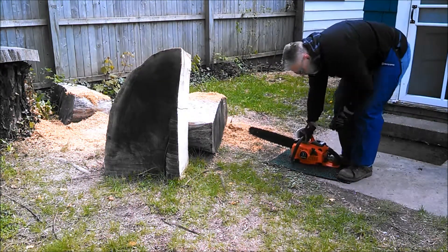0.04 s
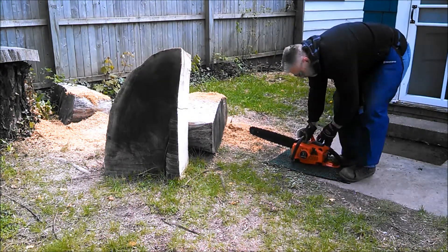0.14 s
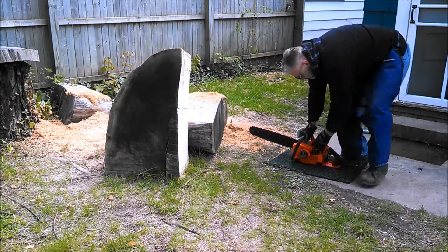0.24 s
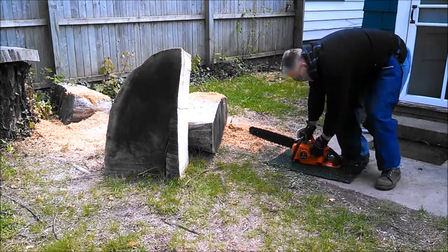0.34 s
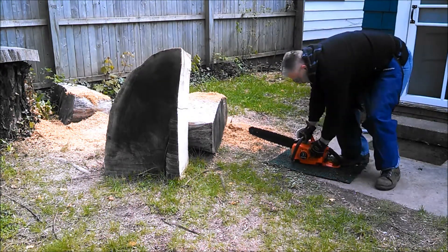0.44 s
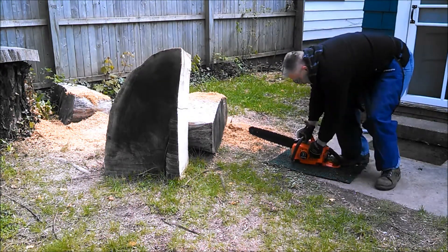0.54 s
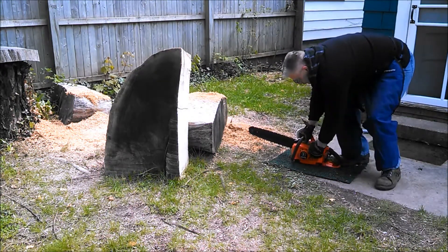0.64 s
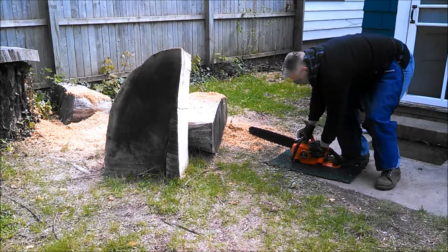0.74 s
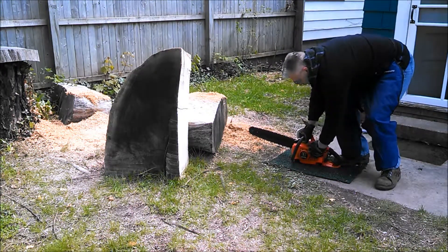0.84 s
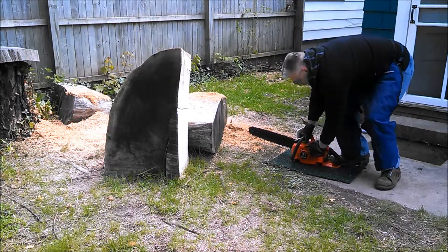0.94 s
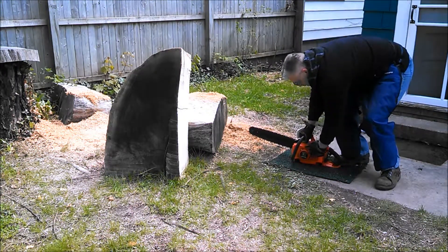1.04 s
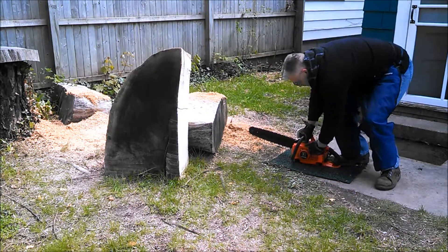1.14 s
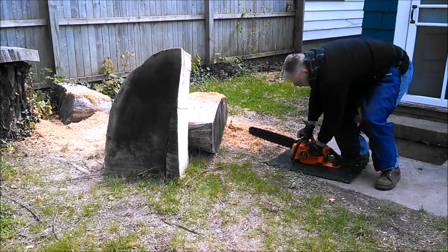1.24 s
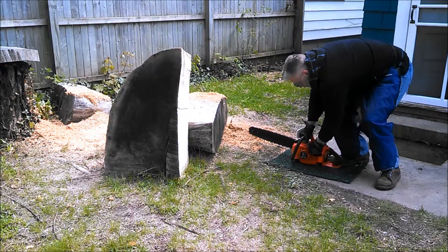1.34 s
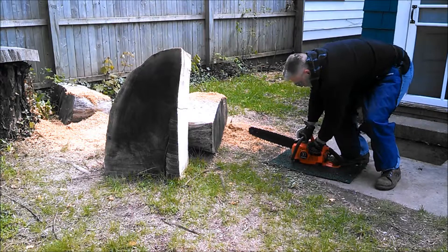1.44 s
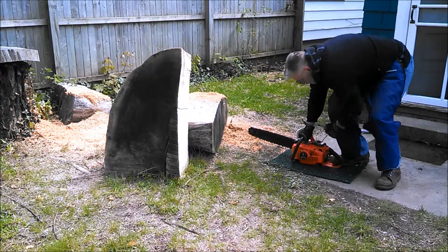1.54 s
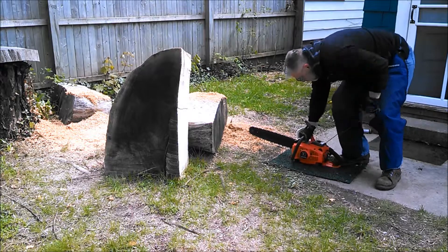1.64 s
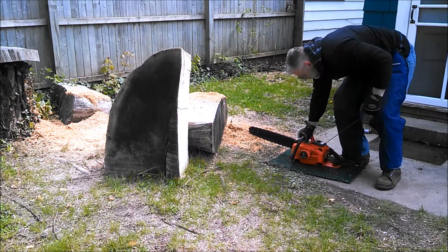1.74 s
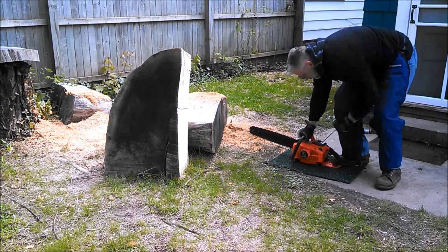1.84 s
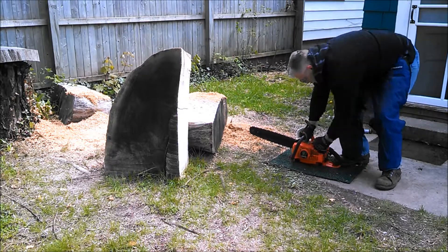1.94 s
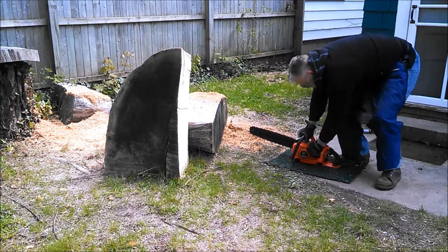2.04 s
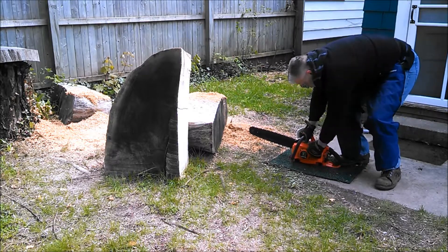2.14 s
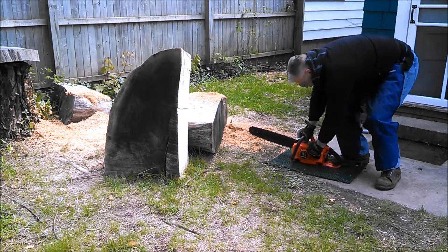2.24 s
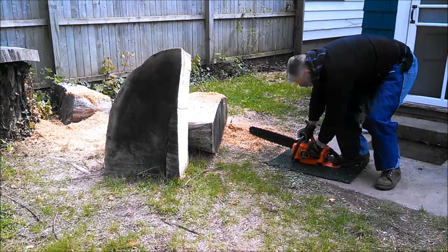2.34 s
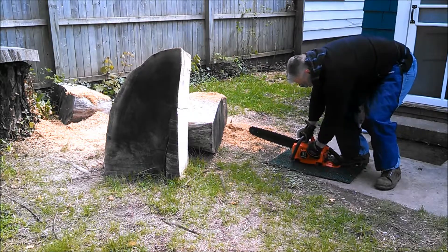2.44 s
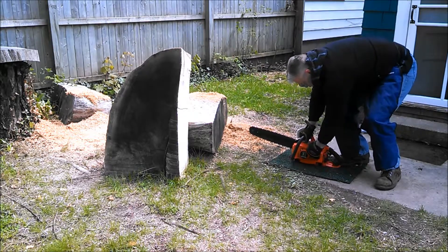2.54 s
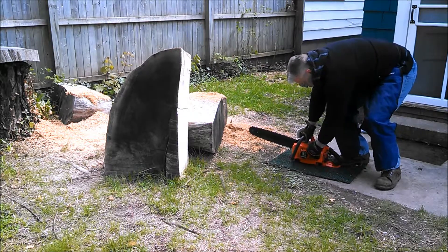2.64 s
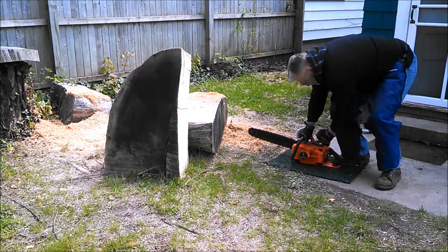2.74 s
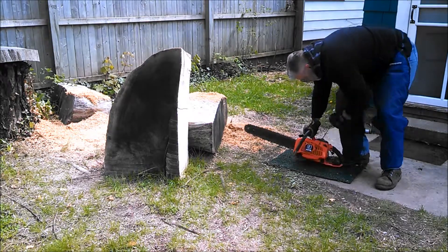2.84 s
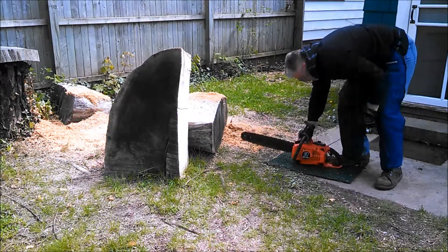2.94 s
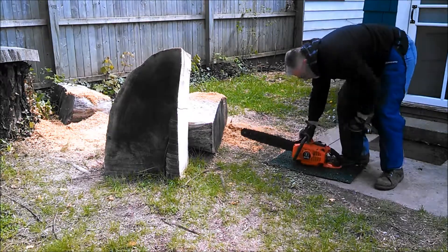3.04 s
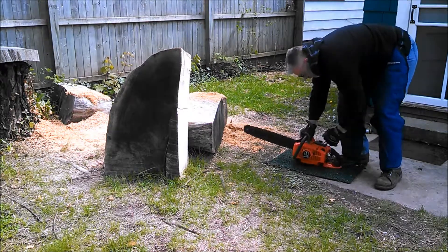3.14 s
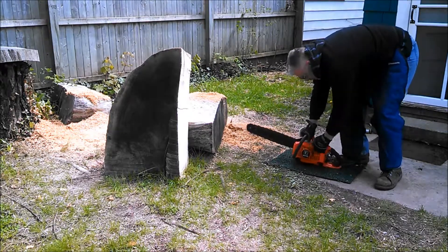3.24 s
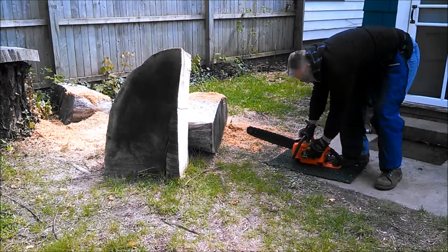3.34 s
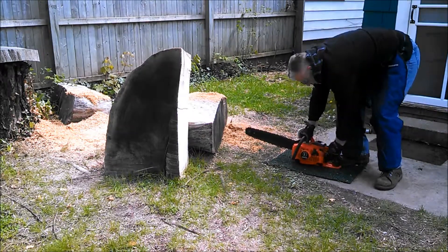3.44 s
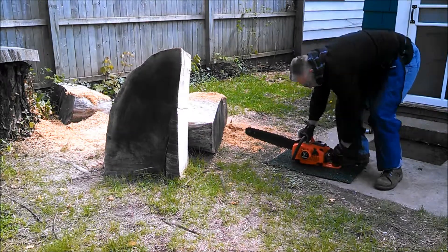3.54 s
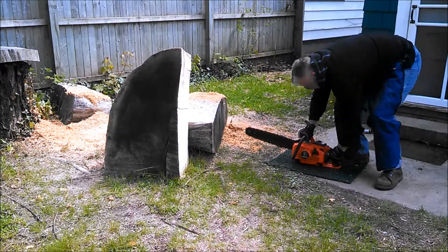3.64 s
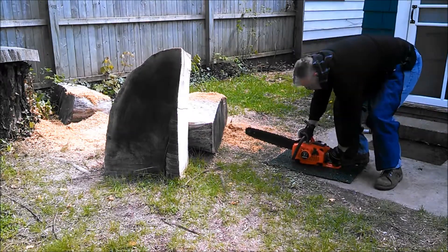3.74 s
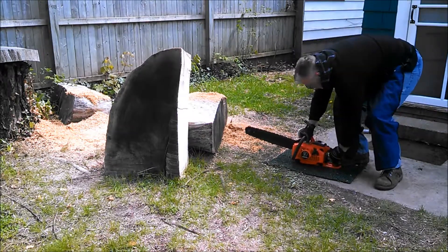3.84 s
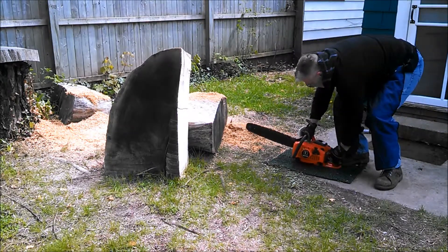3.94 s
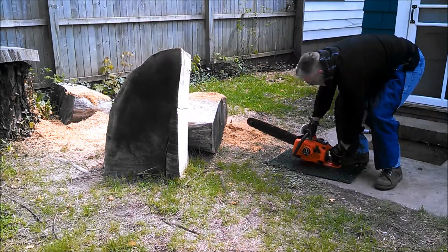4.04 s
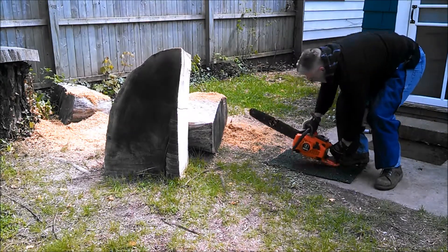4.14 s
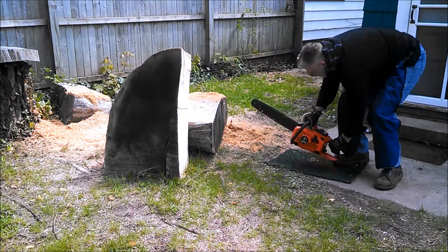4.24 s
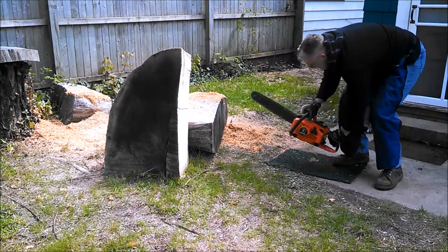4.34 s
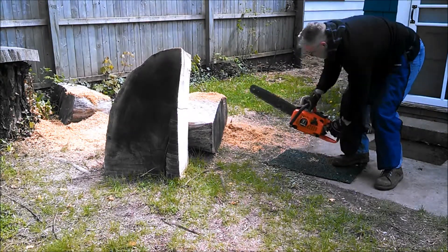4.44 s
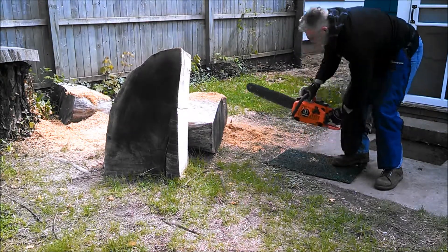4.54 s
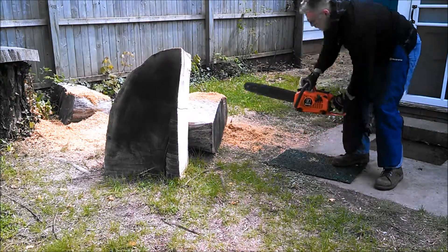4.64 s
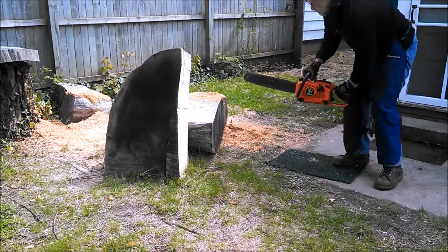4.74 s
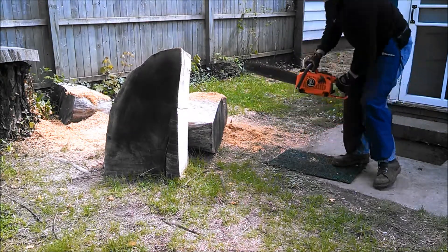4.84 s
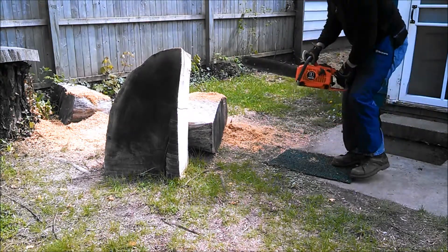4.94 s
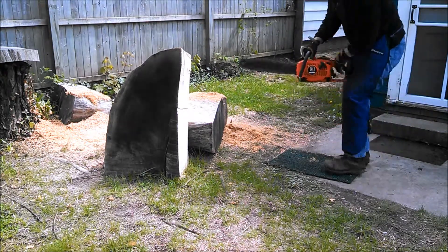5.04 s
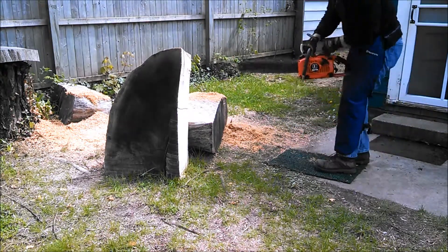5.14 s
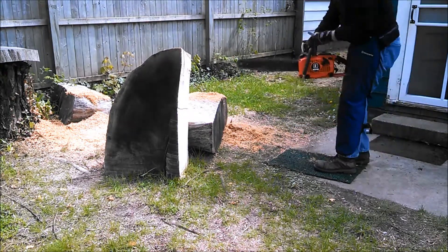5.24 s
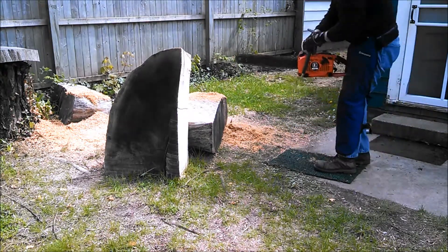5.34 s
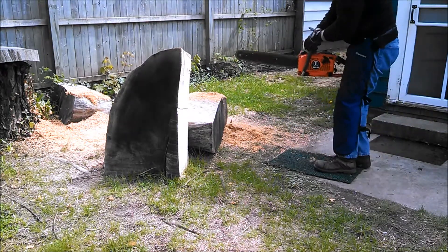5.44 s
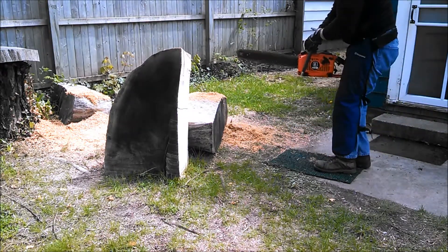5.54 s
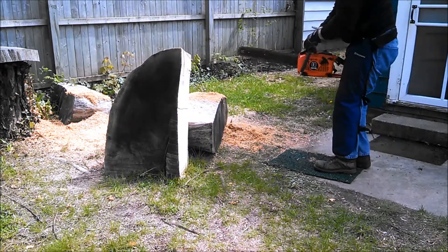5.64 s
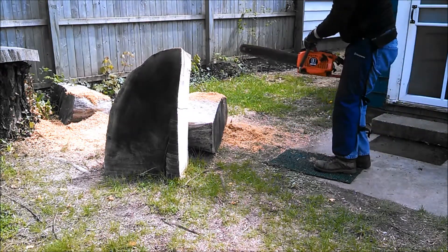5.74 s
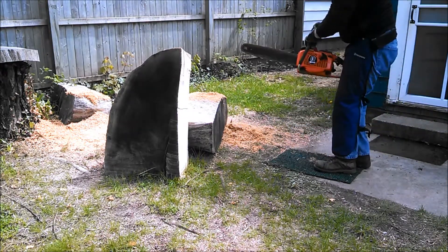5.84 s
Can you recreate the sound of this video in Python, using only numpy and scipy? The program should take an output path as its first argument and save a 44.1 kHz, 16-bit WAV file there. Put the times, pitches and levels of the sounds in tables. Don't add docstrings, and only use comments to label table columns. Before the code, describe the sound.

A chainsaw on a mat is handled with squeaks and metallic knocks in a quiet yard with faint chirps. A first cord pull gives dull chugs that die away; the second catches into a lumpy, clicking idle. It then revs up twice into a buzzing note with rattling chain, and winds down. Stereo camera a few metres away.

```python
import sys
import numpy as np
from scipy import signal
from scipy.fft import rfft, irfft
from scipy.io import wavfile

SR = 44100
rng = np.random.default_rng(int(sys.argv[2]) if len(sys.argv) > 2 else 0)


def gain_from_decibels(decibels):
    exponent = np.asarray(decibels, float) / 20
    return 10 ** exponent


def master(y):
    cut = np.clip(np.atleast_2d(y).T, -1, 1)
    pcm = np.round(cut * 32767)
    wavfile.write(sys.argv[1], SR, pcm.astype(np.int16))


N = 260190


def rms_one(x):
    return x / np.sqrt(np.mean(x ** 2) + 1e-20)


def in_time(rows, outside=None):
    s, *columns = np.transpose(rows)
    return [np.interp(np.arange(N) / SR, s, c, left=outside, right=outside) for c in columns]


def since(s, span_s):
    return np.clip((np.arange(N) / SR - s) / span_s, 0, 1)


def swell(rows):
    edge_db = -20.5
    total = 0
    for s, attack, hold, release, db in rows:
        top, end = s + attack, s + attack + hold
        corners = [(s, db + edge_db), (top, db), (end, db), (end + release, db + edge_db)]
        total = total + gain_from_decibels(in_time(corners, -120)[0])
    return total


def at_hz(points):
    hz, value = np.transpose(points)
    return np.interp(np.log(np.fft.rfftfreq(N, 1 / SR) + 1), np.log(hz), value)


def shaped(x, gain):
    return irfft(rfft(x) * gain, N)


def filtered(x, kind, hz, order=2):
    return signal.sosfilt(signal.butter(order, hz, kind, fs=SR, output="sos"), x)


def drift(rate):
    return rms_one(filtered(rng.standard_normal(N), "low", rate, order=1))


def clicks_at(at, level_db):
    clicks = np.zeros(N)
    clicks[at] = gain_from_decibels(level_db)
    return clicks


def ring(clicks, hz, t60):
    r, w = gain_from_decibels(-60 / (t60 * SR)), 2 * np.pi * hz / SR
    return signal.lfilter([0, np.sin(w)], [1, -2 * r * np.cos(w), r * r], clicks + 1e-18)


def grit(size_db, share):
    contacts = gain_from_decibels(size_db * np.minimum(rng.exponential(1, N), 4)) * (rng.random(N) < share)
    return rms_one((1 + contacts) * rng.standard_normal(N))


# (frequency [Hz], level [dB per Hz])
YARD_COLOUR = [(18, -36), (30, -9), (66, 0.5), (256, -6), (852, -8), (2300, -16.5), (2690, -15),
               (3230, -17), (4660, -19.5), (5450, -18.5), (15500, -35)]
# (frequency [Hz], likeness [0-1])
YARD_LIKENESS = [(100, 0.84), (900, 0.3), (2000, 0), (12000, 0.13)]
YARD_DB = -53


def yard():
    common, near, far = rng.standard_normal((3, N))
    alike = np.clip(at_hz(YARD_LIKENESS), 0, 1)
    colour = gain_from_decibels(at_hz(YARD_COLOUR))
    shared = shaped(common, colour * np.sqrt(alike))
    own_colour = colour * np.sqrt(1 - alike)
    air = np.array([shared + shaped(near, own_colour), 0.49 * (shared + shaped(far, own_colour))])
    return gain_from_decibels(YARD_DB + 0.5 + 0.23 * drift(1.3)) * rms_one(air)


def fence_echo(x):
    t = np.arange(round(.2 * SR)) / SR
    tails = rng.standard_normal((2, len(t))) * gain_from_decibels(-60 * t / .15) * (t > .004)
    tails = filtered(tails, "high", 1700)
    tails = tails / np.sqrt(np.sum(tails[0] ** 2))
    return gain_from_decibels(-13.5) * signal.fftconvolve(x[None], tails, axes=1)[:, :N]


def whistle(row, arch, early, rough, overtone_db):
    s, length_s, hz, bend_hz, db = row
    done = since(s, length_s)
    phase = 2 * np.pi * np.cumsum(hz + bend_hz * np.sin(np.pi * arch * done)) / SR
    level = gain_from_decibels(db) * np.sin(np.pi * done ** early) * (1 + rough * drift(220))
    return level * (np.sin(phase) + gain_from_decibels(overtone_db) * np.sin(1.43 * phase))


# (time [s], length [s], pitch [Hz], bend [Hz], level [dB], overtone [dB])
CHIRPS = [
    (.11, .072, 4520, 160, -45, -8),
    (.185, .095, 4690, -190, -46, -30),
    (.885, .045, 5250, -800, -48, -30),
    (1.375, .03, 6200, -400, -58, -30),
]


def birds():
    calls = [whistle(row[:5], arch=0.51, early=0.74, rough=0.53, overtone_db=row[5]) for row in CHIRPS]
    return gain_from_decibels(.2) * sum(calls)


# (time [s], length [s], pitch [Hz], bend [Hz], level [dB])
SQUEALS = [
    (-.03, .075, 2440, 40, -29),
    (.055, .07, 2560, 40, -33),
    (3.245, .032, 2420, -70, -35),
    (3.285, .085, 2510, 110, -33),
    (3.08, .28, 8950, 350, -46),
]


def reel_squeals():
    squeals = [whistle(row, arch=0.97, early=0.51, rough=0.35, overtone_db=-26) for row in SQUEALS]
    return gain_from_decibels(1.5) * sum(squeals)


# (start [s], attack [s], hold [s], release [s], level [dB])
CORD = [
    (-.2, 0.27, 0.38, 0.31, -50),
    (.34, 0.017, 0.021, 0.045, -39.5),
    (1.6, 0.095, 0.33, 0.28, -38.5),
    (2.2, 0.21, 0.018, 0.072, -42),
    (2.8, 0.15, 0.057, 0.19, -34.5),
]
# (start [s], attack [s], hold [s], release [s], level [dB])
SHUDDER = [
    (.31, 0.032, .02, 0.24, -51),
    (1.63, 0.071, 0.29, 0.19, -37),
    (2.0, 0.11, .2, .15, -51.5),
    (2.85, 0.26, 0.12, 0.43, -38),
    (3.4, 0.35, 0.44, 0.26, -35.5),
]
# (frequency [Hz], level [dB per Hz])
REEL_COLOUR = [(290, -10), (500, -3.5), (1470, -2), (2200, -5), (3380, -6.5), (4500, -10), (6830, -11),
               (15500, -41)]
# (frequency [Hz], level [dB per Hz])
INTAKE_COLOUR = [(530, -4.5), (900, -6), (1500, -15), (2200, -9), (3500, -9), (4100, -10), (4800, -17.5),
                 (6700, -22), (9500, -37), (15500, -75)]
INTAKE_S, INTAKE_ENDS_S = 2.987, 4.05
INTAKE_DB, INTAKE_DB_PER_S = -42, 13.5


def starter():
    intake_db = INTAKE_DB + INTAKE_DB_PER_S * (np.arange(N) / SR - INTAKE_S)
    clatter = gain_from_decibels(intake_db) * since(INTAKE_S - .05, 0.2) * (1 - since(INTAKE_ENDS_S, 0.15))
    grains = grit(size_db=3.5, share=.03)
    reel = rms_one(shaped(grains, gain_from_decibels(at_hz(REEL_COLOUR))))
    intake = rms_one(shaped(grains, gain_from_decibels(at_hz(INTAKE_COLOUR))))
    low = rms_one(filtered(rng.standard_normal(N), "band", [110, 400]))
    patchy = gain_from_decibels(-1.0 + 4.1 * drift(18))
    return patchy * (swell(CORD) * reel + clatter * intake) + gain_from_decibels(6.0) * swell(SHUDDER) * low


# (time [s], peak level [dB], own ring [Hz])
HANDLE_KNOCKS = [
    (0.1774, -30.5, 4760),
    (0.2543, -26, 4570),
    (0.3678, -19, 4230),
    (0.3817, -25, 4160),
    (0.4, -28, 7340),
    (0.4788, -17, 6480),
    (0.518, -26.5, 4350),
    (0.5484, -33, 2020),
    (0.607, -35.5, 4130),
]
# (time [s], peak level [dB], own ring [Hz])
PAWLS = [(1.646, -33.5, 1500), (1.6676, -19.5, 1470), (1.8322, -14.5, 3360), (1.8462, -13.5, 7050),
         (2.014, -27.5, 4400), (2.0813, -25.5, 4550), (2.1138, -23, 6790), (2.2062, -24.5, 1470),
         (2.23, -15.5, 3425), (2.3266, -31, 6660), (2.3825, -37, 3400), (2.4063, -20, 7020),
         (2.439, -30, 1410), (2.8205, -30, 6920), (2.878, -25.5, 6830), (2.9547, -21, 2100),
         (2.9936, -16.5, 1980), (3.0126, -14.5, 4670), (3.041, -16, 2210)]
# (time [s], peak level [dB], own ring [Hz])
CLUTCH_SHOES = [(3.1082, -17.5, 3350), (3.128, -24, 4530), (3.1362, -13.5, 2340), (3.2121, -18.5, 3780),
                (3.3811, -13.5, 3740), (3.448, -21, 2340), (3.5053, -18, 2300), (3.506, -23, 7070),
                (3.5875, -17.5, 3980), (3.6726, -28, 2250), (3.778, -32, 3820), (3.8294, -27, 2270),
                (3.896, -27, 2350), (3.9424, -27, 2040), (3.9754, -16.5, 2430)]
# (fade t60 [s], own ring [dB], housing [dB], sizzle of high knocks [dB])
KNOCK_KINDS = [
    (0.053, -8, -18, -29),
    (.055, -7, -13.5, -17),
    (0.028, 4.5, -4, -33),
]
# (frequency [Hz], level [dB], t60 [share of the knock's])
HOUSING = [(1430, -9, .7), (2290, -8, .4), (3400, -3, 1.7), (4010, -6, .8), (4600, -8, .7), (6700, -9, .7),
           (7050, -9, 1.2), (7950, -13, 1.), (10700, -12, .4)]


def knocks():
    out, t = np.zeros(N), np.arange(round(.12 * SR)) / SR
    hz, mode_db, share = np.transpose(HOUSING)[:, :, None]
    hiss = filtered(rng.standard_normal(N), "band", [700, 8000])
    sizzle = filtered(rng.standard_normal(N), "band", [8500, 15000])
    for table, kind in zip((HANDLE_KNOCKS, PAWLS, CLUTCH_SHOES), KNOCK_KINDS):
        t60, ring_db, housing_db, sizzle_db = kind
        for s, peak_db, own_hz in table:
            i = round(s * SR)
            part = slice(i, i + len(t))
            strength_db = 2.5 * rng.standard_normal((len(HOUSING), 1))
            modes_db = mode_db + housing_db - 4 + strength_db - 60 * t / (share * t60)
            modes = gain_from_decibels(modes_db) * np.sin(2 * np.pi * hz * t)
            own = gain_from_decibels(ring_db - 60 * t / (0.59 * t60)) * np.sin(2 * np.pi * own_hz * t)
            fading = gain_from_decibels(-6 - 60 * t / (.5 * t60)) + gain_from_decibels(-14 - 60 * t / (1.4 * t60))
            crack = fading * (hiss[part] + (own_hz > 3000) * gain_from_decibels(sizzle_db) * sizzle[part])
            onset = np.minimum(t / .0006, 1)
            out[part] += gain_from_decibels(peak_db - 1.5) * (own + modes.sum(axis=0) + crack) * onset
    return out


def swing_back(x, share, delay_s=0.00843):
    return x - share * np.pad(x, (round(delay_s * SR), 0))[:N]


def muffler(modes, at, level_db, bright_db, scatter_db, puff_db, rumble_db):
    out, chance = np.zeros(N), rng.standard_normal((len(at), len(modes)))
    for k, (hz, mode_db, t60) in enumerate(modes):
        tilt_db = bright_db * np.log2(hz / 400)
        blasts = clicks_at(at, level_db + mode_db + tilt_db + scatter_db * chance[:, k])
        out += (-1) ** k * ring(blasts, hz, t60)
    puff = (puff_db + 3.74 * bright_db, .05, [400, 2500])
    rumble = (rumble_db, .22, [170, 520])
    for size_db, t60, band_hz in (puff, rumble):
        blasts = clicks_at(at, level_db + size_db)
        fading = signal.lfilter([1], [1, -gain_from_decibels(-60 / (t60 * SR))], blasts + 1e-18)
        out += filtered(fading * rng.standard_normal(N), "band", band_hz)
    snap = -clicks_at(at, level_db + 13 + np.minimum(bright_db, 3))
    return out + filtered(snap + 1e-18, "band", [350, 1800])


# (time [s], peak level [dB], brightness [dB per octave])
CHUGS = [(0.363, -29, 4), (0.478, -17, 5), (0.52, -27, -3), (1.679, -13, -8.5), (1.74, -9, -9.5),
         (2.405, -33, 8.5), (2.892, -21.5, -6), (3.002, -14.5, -9.5), (3.042, -22, -10),
         (3.073, -16.5, -12.5), (5.457, -19, 7), (5.862, -12.5, 6)]
# (time [s], peak level [dB])
FIRES = [
    (3.126, -9.5),
    (3.2095, -8),
    (3.28, -10.5),
    (3.378, -9.5),
    (3.441, -12),
    (3.499, -11.5),
    (3.585, -7),
]
TURNS_TO_NEXT = [2, 2, 3, 2, 2, 3]
PULLED_S, PULLED_TURN_S, PULLED_DB, PULLED_BRIGHT_DB = 1.7425, .0362, -11.5, -5.5
COAST_TURN_S, COAST_GROWTH = .041, 1.24
COAST_LOSS_DB, COAST_DULLING_DB = 15, 7.5
REBOUND_S, REBOUND_DB = .042, -5
MISS_DB, MISS_BRIGHT_DB, MISS_WARMING_DB_PER_S, MISS_LATE_S = -14, -6, 17.5, 0.00297


def crank_turns():
    turn_s = np.r_[np.full(4, PULLED_TURN_S), COAST_TURN_S * COAST_GROWTH ** np.arange(6)]
    slower = np.log2(turn_s / PULLED_TURN_S)
    coast_db = PULLED_DB - COAST_LOSS_DB * slower
    coast_bright_db = PULLED_BRIGHT_DB - COAST_DULLING_DB * slower
    rows = list(CHUGS) + list(zip(PULLED_S + np.cumsum(turn_s), coast_db, coast_bright_db))
    rows += [(s + REBOUND_S, db + REBOUND_DB, bright) for s, db, bright in rows[-5:]]
    rows += [(s, db, 1.5) for s, db in FIRES]
    for (s, _), (later, _), turns in zip(FIRES, FIRES[1:], TURNS_TO_NEXT):
        warm_db = MISS_WARMING_DB_PER_S * (s - FIRES[0][0])
        for k in range(1, turns):
            miss_s = s + (later - s) * k / turns + MISS_LATE_S
            rows.append((miss_s, MISS_DB + warm_db / 2, MISS_BRIGHT_DB + warm_db))
    return rows


# (frequency [Hz], level [dB], t60 [s])
COOL_MUFFLER = [(140, -5.5, 0.071), (248.4, -2.5, 0.088), (299.5, -4, 0.098), (404.4, 4.5, 0.042),
                (527, 5, 0.015), (738, 0.5, 0.011), (1060, -17, 0.021), (1390, -15, 0.0019),
                (1750, -24.5, 0.048)]


def cranking():
    s, peak_db, bright_db = np.transpose(crank_turns())
    chugs = muffler(COOL_MUFFLER, (s * SR).astype(int), peak_db - 9.0, bright_db,
                    scatter_db=2.5, puff_db=-7.5, rumble_db=3.5)
    return filtered(swing_back(chugs, 0.44), "low", 2200, order=1)


# (frequency [Hz], level [dB per Hz])
CHAIN_COLOUR = [(530, 15), (900, -0.5), (1500, -1), (2100, -2), (3420, -1), (4600, -5.5), (6730, 0),
                (9600, -10.5), (12500, -18.5), (15500, -22.5)]
# (frequency [Hz], width [Hz], level [dB])
CHAIN_RINGS = [(1570, 40, -34), (2130, 49, -21), (2980, 33, -4.5), (4620, 240, -12), (5150, 51, -9),
               (7050, 170, -47.5)]


def chain():
    links = grit(size_db=-4.5, share=0.03) * gain_from_decibels(0.81 * drift(16.0))
    hz = np.fft.rfftfreq(N, 1 / SR)
    rings = 0
    for centre_hz, width_hz, level_db in CHAIN_RINGS:
        rings = rings + gain_from_decibels(level_db + 8.0) / (1 + ((hz - centre_hz) / width_hz) ** 2)
    no_bass = 1 / (1 + (950 / (hz + 1)) ** 4)
    return rms_one(shaped(links, gain_from_decibels(at_hz(CHAIN_COLOUR)) * (1 + rings) * no_bass))


CHAIN_SHUT_DB, CHAIN_OPEN_DB = -25.5, -21
CLUTCH_BITES_S, CLUTCH_S, CLUTCH_DB_PER_S = 3.96, 4.33, 31.5


def driven_chain(throttle, turns):
    not_gripped_s = np.maximum(CLUTCH_S - np.arange(N) / SR, 0)
    chain_db = CHAIN_SHUT_DB + (CHAIN_OPEN_DB - CHAIN_SHUT_DB) * throttle - CLUTCH_DB_PER_S * not_gripped_s
    throb = 1 + 0.16 * np.cos(2 * np.pi * (turns - .1))
    links = chain()
    links = links - .6 * (1 - since(CLUTCH_BITES_S, 0.5)) * filtered(links, "high", 3000)
    return since(CLUTCH_BITES_S, 0.031) * gain_from_decibels(chain_db + 3.5) * throb * links


# (frequency [Hz], level [dB], t60 [s])
COVERS = [
    (1223, -5.5, 0.038),
    (1607, -4, 0.031),
    (2066, -2, 0.028),
]


def covers(at, level_db):
    taps = clicks_at(at, level_db)
    return sum(gain_from_decibels(db + 4.7 * drift(4.1)) * ring(taps, hz, t60) for hz, db, t60 in COVERS)


def piston_slap(at, speed):
    strength = (speed[at] > 45) * np.clip(3 - speed[at] / 30, .1, 1)
    slap = np.zeros(N)
    slap[np.minimum(at + round(.007 * SR), N - 1)] = gain_from_decibels(-15 + rng.normal(0, 3, len(at))) * strength
    return ring(slap, 2350, .013)


FIRST_SHUT_DB, FIRST_OPEN_DB, FIRST_PER_OCTAVE_DB = -52.5, -33, 8
SECOND_SHUT_DB, SECOND_OPEN_DB, SECOND_PER_OCTAVE_DB = -22, -43, 6


def engine_tones(turns, speed, throttle, octaves, on_mat):
    lagging = np.roll(throttle, round(.03 * SR))
    first_db = FIRST_SHUT_DB + (FIRST_OPEN_DB - FIRST_SHUT_DB) * lagging + FIRST_PER_OCTAVE_DB * octaves
    second_db = SECOND_SHUT_DB + (SECOND_OPEN_DB - SECOND_SHUT_DB) * throttle
    second_db = second_db + SECOND_PER_OCTAVE_DB * (octaves - .5) + 2.5 * drift(6)
    tones = gain_from_decibels(first_db + 4.0) * np.sin(2 * np.pi * turns)
    tones += gain_from_decibels(second_db - 12.5) * np.sin(4 * np.pi * turns + 2.2)
    tones += gain_from_decibels(-19) * on_mat * np.sin(6 * np.pi * turns)
    return np.clip((speed - 50) / 30, 0, 1) * tones


# (frequency [Hz], level [dB], t60 [s])
HOT_MUFFLER = [(150, -11, 0.047), (331, -2, 0.024), (399.3, -4, 0.067), (529, 0.5, 0.032), (711, 5, 0.0088),
               (797, 0, 0.023), (977, -7, 0.014), (1190, -10.5, 0.0069), (1620, -22, 0.045)]
IDLE_BRIGHT_DB, BRIGHT_PER_OCTAVE_DB = -4, 4.5
HELD_BRIGHT_DB, OVERRUN_BRIGHT_DB, OVERRUN_SCATTER_DB = 1, 2.5, 1.3
TURNED_S, GROUND_NEAR_S, GROUND_TURNED_S = 5.05, 0.00085, 0.00045


def exhaust(at, speed, exhaust_db, throttle, octaves, held_high, on_mat):
    rate = speed[at]
    overrun = (1 - throttle) * held_high
    bright_db = IDLE_BRIGHT_DB + BRIGHT_PER_OCTAVE_DB * (octaves + 1)
    bright_db = bright_db + HELD_BRIGHT_DB * held_high + OVERRUN_BRIGHT_DB * overrun
    uneven_db = 1.2 * 60 / rate * rng.standard_normal(len(at))
    blast_db = exhaust_db[at] + 4.0 - 10 * np.log10(rate / 100) + uneven_db
    scatter_db = 1.7 * (50 / rate) ** 1.3 * np.minimum(rate / 55, 1) + OVERRUN_SCATTER_DB * overrun[at]
    blasts = muffler(HOT_MUFFLER, at, blast_db, bright_db[at], scatter_db,
                     puff_db=-30, rumble_db=-5 - rate / 6)
    blasts = swing_back(blasts, 0.43 * on_mat)
    before = swing_back(blasts, -.65 * held_high, GROUND_NEAR_S)
    after = swing_back(blasts, -0.37, GROUND_TURNED_S)
    turned = since(TURNED_S, 0.16)
    return (1 - turned) * before + turned * after


# (time [s], speed [turns per s])
CRANK_SPEED = [(3.6, 36.2), (3.87, 40.6), (3.94, 42.7), (4.01, 55.6), (4.07, 59.5), (4.15, 61.6),
               (4.22, 66.6), (4.39, 97.7), (4.57, 125.7), (4.63, 132.1), (4.775, 115.5), (5.0, 145.9),
               (5.075, 155), (5.21, 135.6), (5.37, 115.6), (5.6, 95.8), (5.74, 83.5), (5.9, 76.5)]
# (time [s], level [dB])
EXHAUST_LEVEL = [(3.6, -27), (3.94, -21.5), (4.0, -18), (4.2, -19), (4.33, -17.5), (4.44, -16), (4.54, -20),
                 (4.6, -17), (4.66, -35), (4.74, -27.5), (4.87, -15.5), (4.96, -21.5), (5.05, -25),
                 (5.18, -37), (5.3, -32.5), (5.46, -32), (5.56, -28), (5.9, -30.5)]
SHUT_DB, OPEN_DB = -28.5, -19.5
LIFTED_S = 4.25


def engine():
    speed, = in_time(CRANK_SPEED)
    exhaust_db, = in_time(EXHAUST_LEVEL)
    throttle = np.clip((exhaust_db - SHUT_DB) / (OPEN_DB - SHUT_DB), 0, 1)
    octaves = np.log2(speed / 80)
    held_high = since(4.46, 0.19)
    on_mat = np.clip((LIFTED_S - np.arange(N) / SR) / 0.083, 0, 1)
    running = since(CRANK_SPEED[0][0], .02) > 0
    turns = np.cumsum(speed * running) / SR + .54
    at = np.flatnonzero(np.diff(np.floor(turns)) > 0)
    slipping = (at / SR > CLUTCH_S - .2) * (at / SR < CLUTCH_S)
    at = at + (.0004 * SR * slipping * rng.standard_normal(len(at))).astype(int)
    out = exhaust(at, speed, exhaust_db, throttle, octaves, held_high, on_mat)
    out = out + held_high * covers(at, -27 + 4 * throttle[at]) + piston_slap(at, speed)
    return out + engine_tones(turns, speed, throttle, octaves, on_mat) + driven_chain(throttle, turns)


# (frequency [Hz], gain [ratio])
SHADOW = [(100, 0.74), (900, 0.71), (2000, 0.25), (3500, 0.022), (6000, 0.011), (12000, 0.028)]


def scene():
    saw = birds() + reel_squeals() + starter() + knocks() + cranking() + engine()
    saw = filtered(saw, "high", 75)
    bounce = round(.0065 * SR)
    saw[bounce:] += 0.089 * signal.lfilter([.3], [1, -.7], saw)[:-bounce]
    return np.array([saw, shaped(saw, at_hz(SHADOW))]) + fence_echo(saw) + yard()


def top_cut(x):
    return signal.sosfilt(signal.butter(12, 16860, fs=SR, output="sos"), x)


def record(dry):
    port_delay = 16
    late = np.pad(dry, ((0, 0), (port_delay, 0)))[::-1, :N]
    zero, pole = np.exp(-2 * np.pi * np.array([450, 70]) / SR)
    x = signal.lfilter([1, -zero], [1, -pole], dry - late)
    x = .95 * np.tanh(x / .95)
    x = signal.sosfilt(signal.cheby2(10, 60, 16300, fs=SR, output="sos"), x)
    return top_cut(x)


dry = scene()
out = record(dry)
master(out)
```